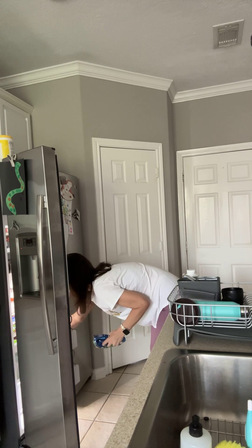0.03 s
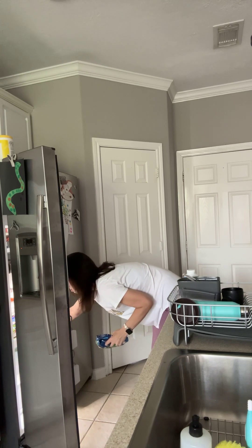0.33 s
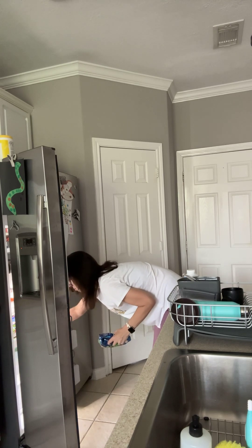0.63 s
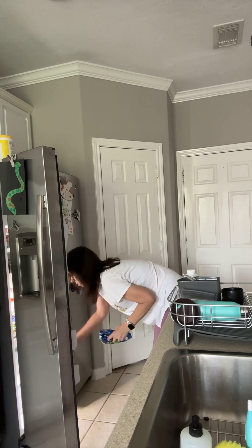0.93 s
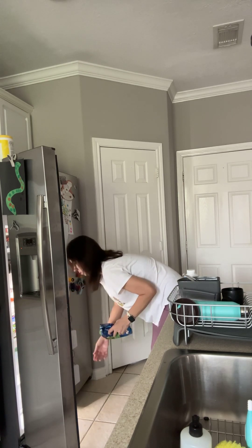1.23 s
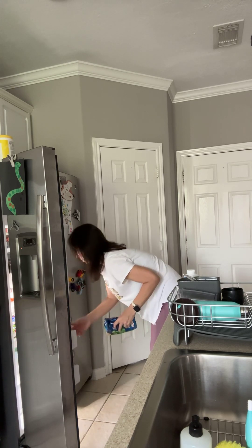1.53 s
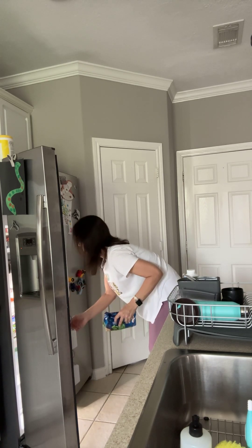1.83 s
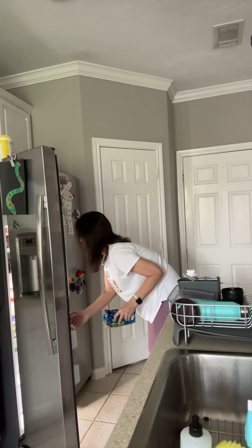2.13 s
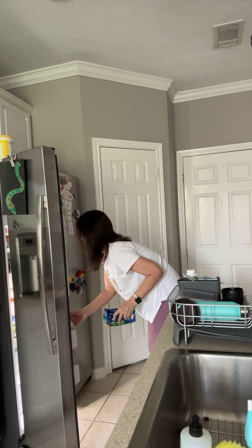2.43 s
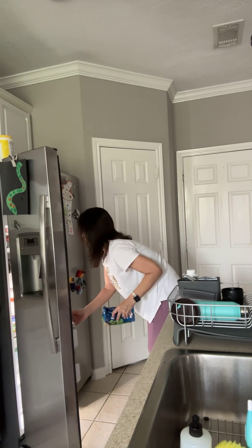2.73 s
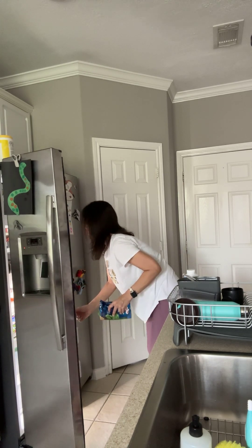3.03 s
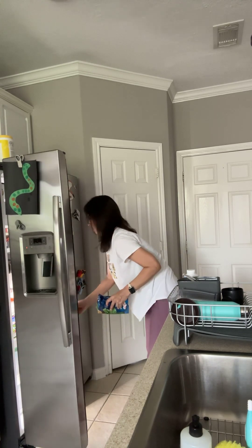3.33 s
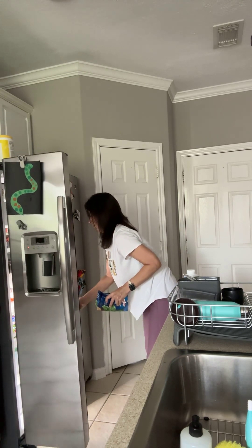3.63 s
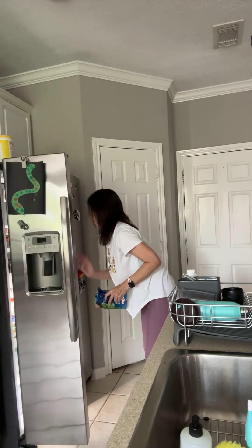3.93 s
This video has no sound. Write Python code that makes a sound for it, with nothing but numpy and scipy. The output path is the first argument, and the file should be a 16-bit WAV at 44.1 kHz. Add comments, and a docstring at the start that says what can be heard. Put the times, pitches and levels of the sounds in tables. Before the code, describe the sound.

A refrigerator is closed up, heard nearby in a quiet kitchen. A drawer rolls in, containers clacking, and thuds at 0.3 seconds. A food bag crinkles around 1.7 seconds. Light clicks and taps follow from 2.3 to 3, then a soft hand bump and faint creaks. At 3.4 the door shuts with a loud, slightly distorted bang and low thump, rebounding as jars rattle until about 3.8.

```python
"""A refrigerator in a tiled kitchen, heard from close by through a narrow-band microphone, in still air.
A drawer rolls in, its containers clack, a food bag crinkles, and the drawer thuds against its stop.
After a pause the bag rustles and snaps, things on the shelves click and tap, and a hand bumps the door.
The door creaks faintly, then shuts with a low thump and a bang that overloads the microphone.
Jars rattle in its shelves, the door rebounds, and the containers settle."""
import sys
import numpy as np
from scipy import signal
from scipy.io import wavfile
from scipy.ndimage import uniform_filter1d

SR = 44100
rng = np.random.default_rng(int(sys.argv[2]) if len(sys.argv) > 2 else 0)


def to_wav(sig):
    """Store sig (one row per channel, or 1-D mono) as 16-bit WAV at the path in sys.argv[1].

    Samples outside -1..1 are clipped; the rate is SR.
    """
    pcm = np.clip(np.atleast_2d(sig), -1, 1) * 32767
    pcm = np.round(pcm).astype(np.int16)
    wavfile.write(sys.argv[1], SR, pcm.T)  # frames by channels


N = 176400
TIME = np.arange(N) / SR
RING_TIME = TIME[:SR]
EDGES_HZ = np.geomspace(22, 11000, 28)
CENTRES_HZ = np.sqrt(EDGES_HZ[1:] * EDGES_HZ[:-1])
BANK = [signal.butter(2, pair, "band", fs=SR, output="sos") for pair in zip(EDGES_HZ, EDGES_HZ[1:])]


def from_db(db):
    """Decibels to gain."""
    return 10 ** (np.asarray(db) / 20)


def unit(x):
    """Scale to energy 1."""
    return x / np.sqrt(np.sum(x ** 2) + 1e-30)


def per_band(points):
    """Read (freq_hz, value) points at the band centres, on a log-frequency axis."""
    hz, value = np.transpose(points)
    return np.interp(np.log(CENTRES_HZ), np.log(hz), value)


def level(curve):
    """Gain over time from (time_s, level_db) points, silent outside them."""
    time_s, db = np.transpose(curve)
    return from_db(np.interp(TIME, time_s, db)) * (TIME >= time_s[0]) * (TIME <= time_s[-1])


def dying(t60_s):
    """Envelope that falls 60 dB in t60_s."""
    return np.exp(-np.log(1000) * RING_TIME / t60_s)


def strokes(rows, attack_s, release_s):
    """Attack, hold and release for each (start_s, length_s, level_db)."""
    return sum(from_db(db) * np.clip((TIME - start_s) / attack_s, 0, 1)
               * np.exp(-np.maximum(TIME - start_s - length_s, 0) / release_s)
               for start_s, length_s, db in rows)


def coloured(sources, colour):
    """Third-octave bands, fed in turn from the sources and set to a relative density per Hz; energy 1."""
    gains = from_db(per_band(colour)) * np.sqrt(CENTRES_HZ)
    bands = [unit(signal.sosfilt(sos, sources[k % len(sources)] + 1e-18)) for k, sos in enumerate(BANK)]
    return unit(sum(gain * band for gain, band in zip(gains, bands)))


def hiss(colour):
    """Steady coloured noise, rms 1."""
    return coloured(rng.standard_normal((2, N)), colour) * np.sqrt(N)


def clear_ring(modes, contact_s=0.00086):
    """Decaying sines that take contact_s to get going; energy 1."""
    rise = 1 - np.exp(-(RING_TIME / contact_s) ** 2)
    sines = sum((-1) ** k * from_db(db) * np.sin(2 * np.pi * hz * RING_TIME) * dying(t60_s)
                for k, (hz, db, t60_s) in enumerate(modes))
    return unit(rise * sines)


def struck(contacts, colour, modes, dense_t60_s, modes_db, dulling=0):
    """Every contact rings dense short modes and a few clear ones; its level is its energy over 10 ms.
    Weaker contacts are softer: they lose `dulling` dB per octave for each dB below the strongest."""
    out = np.zeros(N + SR)
    clear = clear_ring(modes)
    dense_decay = dying(dense_t60_s)[:SR // 4]
    strongest_db = max(db for _, db in contacts)
    for start_s, db in contacts:
        softened = [(hz, band_db - dulling * (strongest_db - db) * np.log2(hz)) for hz, band_db in colour]
        dense = coloured(rng.standard_normal((2, len(dense_decay))) * dense_decay, softened)
        ring = from_db(modes_db) * clear
        ring[:len(dense)] += dense
        start = int(start_s * SR)
        out[start:start + SR] += from_db(db) * unit(ring) * np.sqrt(SR / 100)
    return out[:N]


def grains(envelope, colour, per_s, spread_db, snap_t60_s=.005):
    """Random tiny snaps of uneven size under an envelope, each a fast-dying burst of noise."""
    sizes = from_db(spread_db * np.minimum(rng.exponential(1, N), 3))
    snaps = sizes * (rng.random(N) < per_s / SR)
    power = signal.lfilter([1], [1, -from_db(-120 / (snap_t60_s * SR))], snaps ** 2 + 1e-18)
    crackle = unit(np.sqrt(power) * rng.standard_normal((2, N))) * envelope
    return coloured(crackle, colour) * np.sqrt(np.sum(envelope ** 2))


def ringing(snaps, modes, ring_db):
    """A run of small contacts together with the modes that it keeps ringing."""
    ring = unit(signal.fftconvolve(snaps, clear_ring(modes))[:N])
    return snaps + from_db(ring_db) * ring * np.sqrt(np.sum(snaps ** 2))


# room tone spectrum: freq_hz, density_db
AIR_COLOUR = [(24, -58.5), (40, -45), (322, -4.5), (432, -4), (495, -8), (976, -4.5), (1040, -8),
              (2020, -7.5), (5000, -18.5), (8990, -34.5)]

def still_air():
    """The kitchen's still air, a faint steady hiss all around the microphone."""
    return from_db(-67.5) * hiss(AIR_COLOUR)


# the drawer's travel: time_s, level_db
ROLL_LEVEL = [(0, -35.5), (.05, -35.5), (.09, -34.5), (.15, -40), (.235, -42), (.255, -35.5), (.36, -40),
              (.44, -52.5)]
# rumble spectrum: freq_hz, density_db
ROLL_COLOUR = [(24, -36), (40, -28.5), (240, 5.5), (381, 7), (1040, -19), (1360, -35.5), (2470, -39.5),
               (4000, -37.5), (5200, -79), (8800, -120)]

def drawer_roll():
    """The drawer rumbles in close to the microphone and shudders to rest."""
    return level(ROLL_LEVEL) * hiss(ROLL_COLOUR)


# container contacts: start_s, level_db
CLACKS = [(.052, -37.5), (.0595, -24.5), (.064, -26), (.074, -46), (.47, -58.5)]
# their dense modes: freq_hz, density_db
CLACK_COLOUR = [(88, -43), (150, -7.5), (398, -2.5), (750, -7.5), (1540, -6), (1770, -14.5), (2100, 2.5),
                (3450, -23.5), (5660, -14), (8990, -27.5)]
# their clear modes: pitch_hz, level_db, t60_s
CONTAINER_MODES = [(1943, -5, 0.041), (2423, 1.5, 0.022), (3250, -9, 0.094), (5857, -1, 0.042)]

def container_clacks():
    """Plastic containers knock together inside the drawer."""
    return struck(CLACKS, CLACK_COLOUR, CONTAINER_MODES, dense_t60_s=0.07, modes_db=-8)


# folds of the bag: start_s, length_s, level_db, lowest_hz
CRINKLES = [(0.173, 0.038, -67.5, 5050), (0.176, 0.0056, -47.5, 5000), (1.649, 0.016, -53, 1410),
            (1.666, 0.023, -39, 298), (1.694, 0.022, -44, 1810), (1.722, 0.015, -52.5, 2000),
            (1.749, .011, -39, 1420), (1.775, 0.0058, -46, 3000), (2.991, 0.0084, -58, 3940)]
# crackle spectrum: freq_hz, density_db
BAG_COLOUR = [(200, -31.5), (812, -9.5), (1980, -6), (3000, -8), (5850, -4), (8990, -32.5)]
# modes of a typical fold: pitch_hz, level_db
BAG_MODES = [(1040, -2.5), (1320, -7), (1970, 3.5), (2390, -11.5), (4110, -5), (4670, -1), (5720, -5.5),
             (7300, -2.5)]

def food_bag(detune=.025, fold_spread_db=2.5, t60_s=.035):
    """Each crinkle is a burst of snaps in its own fold: small folds lack bass, and no two ring alike."""
    crackle = grains(np.ones(N), BAG_COLOUR, per_s=3000, spread_db=3)
    out = np.zeros(N)
    for start_s, length_s, db, lowest_hz in CRINKLES:
        envelope = strokes([(start_s, length_s, db)], attack_s=0.0018, release_s=0.0055)
        bass_cut = signal.butter(2, lowest_hz, "high", fs=SR, output="sos")
        snaps = signal.sosfilt(bass_cut, crackle * envelope + 1e-18)
        modes = [(hz * (1 + rng.normal(0, detune)), mode_db + rng.normal(0, fold_spread_db), t60_s)
                 for hz, mode_db in BAG_MODES]
        out += unit(ringing(snaps, modes, ring_db=-3.5)) * np.sqrt(np.sum(envelope ** 2))
    return out


# contacts with the stop: start_s, level_db
THUDS = [(.2572, -11), (.2602, -16.5), (.279, -24), (.294, -32.5)]
# the drawer's dense modes: freq_hz, density_db
THUD_COLOUR = [(30, -46), (207, -25.5), (367, 4), (538, -7.5), (827, -15), (1500, -21), (2000, -19.5),
               (3900, -25), (4500, -23.5), (8990, -65)]
# its clear modes: pitch_hz, level_db, t60_s
DRAWER_MODES = [(181.7, -21.5, 0.25), (336, -1, 0.055), (369, 0, 0.035), (538, -13.5, .15),
                (620.6, -14, 0.12), (639.6, -21.5, 0.23), (807, -13.5, 0.14)]

def drawer_thud():
    """The drawer meets its stop, each contact weaker and duller than the last."""
    return struck(THUDS, THUD_COLOUR, DRAWER_MODES, dense_t60_s=0.045, modes_db=3.5, dulling=0.08)


# spells of jostling: start_s, length_s, level_db
JOSTLES = [(.317, 0.017, -40), (.342, 0.02, -47.5), (3.792, .022, -47)]
# their spectrum: freq_hz, density_db
JOSTLE_COLOUR = [(590, -1), (1000, 9), (1800, 0.5), (2820, -4.5), (4000, -18), (6000, -16), (8990, -51.5)]

def container_jostle():
    """Containers jostle after the drawer stops, and settle after the bang."""
    envelope = strokes(JOSTLES, attack_s=0.0026, release_s=0.0054)
    contacts = grains(envelope, JOSTLE_COLOUR, per_s=450, spread_db=1)
    return ringing(contacts, CONTAINER_MODES, ring_db=-2)


# the bag's snap, then small contacts: start_s, level_db
CLICKS = [(1.757, -46.5), (2.343, -60.5), (2.574, -37), (2.982, -49.5), (3.028, -61.5)]
# the plastic's dense modes: freq_hz, density_db
CLICK_COLOUR = [(290, -63.5), (500, -14), (1540, 3), (1890, -33), (2240, 3), (3140, 11), (4200, -18),
                (4680, 0), (8990, -70)]
# its clear modes: pitch_hz, level_db, t60_s
CLICK_MODES = [(1912, 1.5, 0.033), (2975, -4, 0.05), (4680, -8.5, 0.035)]

def plastic_clicks():
    """A sharp snap in the bag's rustle, then hard plastic clicks, close and nearly dry."""
    return struck(CLICKS, CLICK_COLOUR, CLICK_MODES, dense_t60_s=0.065, modes_db=3)


# an item's contacts with the shelf: start_s, level_db
TAPS = [(2.477, -53), (2.4815, -37), (2.486, -48)]
# dense modes: freq_hz, density_db
TAP_COLOUR = [(100, -55), (183, 0), (587, 3.5), (1270, -6), (1650, -29), (3250, -41), (3510, -14),
              (5020, -3), (7590, -18), (8990, -63)]
# clear modes: pitch_hz, level_db, t60_s
TAP_MODES = [(599, 0, 0.032), (4030, -20, 0.057), (4970, 3.5, 0.022), (7100, 1.5, 0.011)]

def shelf_tap():
    """An item is set down near the microphone, touching three times in quick succession."""
    return struck(TAPS, TAP_COLOUR, TAP_MODES, dense_t60_s=0.1, modes_db=3)


# the hand's bump and the door's rebound: start_s, level_db
BUMPS = [(3.083, -29.5), (3.142, -52.5)]
# the open door's dense modes: freq_hz, density_db
BUMP_COLOUR = [(50, -60), (195, 6.5), (977, 5), (1660, -7.5), (2890, -12.5), (4700, -41), (5700, -25),
               (8000, -47)]
# its clear modes: pitch_hz, level_db, t60_s
BUMP_MODES = [(217, -8, 0.134), (397, 15.5, 0.039), (592, 3, 0.1), (981, 6, 0.095), (1090, 16.5, 0.025),
              (2850, -5, 0.046)]

def hand_bumps():
    """A hand bumps the door softly, and the door knocks back once, fainter and duller."""
    return struck(BUMPS, BUMP_COLOUR, BUMP_MODES, dense_t60_s=0.15, modes_db=4.5, dulling=0.18)


# spells of creaking: start_s, length_s, level_db
CREAKS = [(3.195, 0.036, -57), (3.212, 0.01, -55.5), (3.236, 0.018, -57.5), (3.315, 0.015, -58),
          (3.40, 0.03, -57.5)]
# their spectrum: freq_hz, density_db
CREAK_COLOUR = [(300, -17), (753, -5), (1480, -11), (1940, 0), (2740, -10.5), (8000, -35)]
# the modes they ring: pitch_hz, level_db, t60_s
CREAK_MODES = [(810, -3.5, .04), (1950, 2, .035)]

def door_creaks():
    """The swinging door creaks faintly, in dense runs of tiny snaps."""
    envelope = strokes(CREAKS, attack_s=0.0079, release_s=0.0054)
    snaps = grains(envelope, CREAK_COLOUR, per_s=3000, spread_db=-2.5)
    return ringing(snaps, CREAK_MODES, ring_db=-7)


# the shutting door's contacts: start_s, level_db
BANGS = [ (3.4272, -23), (3.4345, -1.5), (3.4385, 4), (3.445, -3), (3.5855, -14.5), (3.594, -17.5)]
# its dense modes: freq_hz, density_db
BANG_COLOUR = [(30, -51.5), (132, -26), (455, -4.5), (700, -11), (1080, -5), (1650, -7.5), (2540, -8),
               (2930, -10.5), (3220, -15.5), (3550, -11), (8990, -26.5)]
# its clear modes: pitch_hz, level_db, t60_s
DOOR_MODES = [(324, -6, 0.14), (840, -12, 0.18), (933.6, -2.5, 0.23), (1004, 6.5, 0.12), (1125, 17, 0.054),
              (1290, -4.5, 0.081), (1323, -11.5, 0.363), (1470, -4.5, 0.18), (1973, 8.5, 0.068),
              (2306, -13.5, 0.24), (2543, 14, 0.055), (4120, -1.5, 0.069)]

def door_bang():
    """The door shuts by the microphone: first touch, a blow of three contacts, and a double rebound."""
    return struck(BANGS, BANG_COLOUR, DOOR_MODES, dense_t60_s=0.053, modes_db=-1.5)


def low_thump(peak_s=3.44, width_s=0.0025, level_db=-17):
    """One short, deep thump sounding under the bang."""
    return from_db(level_db) * np.exp(-((TIME - peak_s) / width_s) ** 2 / 2)


# the shaking of the jars: time_s, level_db
RATTLE_LEVEL = [(3.44, -37), (3.47, -18), (3.57, -19.5), (3.62, -29.5), (3.7, -38.5), (3.73, -40),
                (3.76, -43.5), (3.785, -55), (3.803, -56), (3.84, -73)]
# rattle spectrum: freq_hz, density_db
RATTLE_COLOUR = [(88, -52), (150, -19.5), (288, -11.5), (398, 6), (725, -10), (1000, 1), (1390, 2),
                 (1710, 1), (2170, -0.5), (5570, -4.5), (8990, -47)]

def jar_rattle():
    """Jars shake in the door shelves and keep the door's modes ringing."""
    contacts = grains(level(RATTLE_LEVEL), RATTLE_COLOUR, per_s=800, spread_db=1.8)
    return ringing(contacts, DOOR_MODES, ring_db=-13)


# the kitchen's decay: freq_hz, t60_s
ROOM_T60 = [(60, 0.4), (250, 0.46), (1000, 0.28), (4000, 0.42), (9000, 0.37)]
# spectrum of its reverberation: freq_hz, density_db
ROOM_COLOUR = [(60, -12), (250, 2), (3000, 0), (9000, 1.5)]

def gated_reverb(delay_s=0.0031, build_s=0.0093, gate_s=.118):
    """The room's reverberation, with its tail gated short after about 0.12 s."""
    build = np.clip((RING_TIME - delay_s) / build_s, 0, 1)
    shape = build / (1 + (RING_TIME / gate_s) ** 8)
    tails = [rng.standard_normal(SR) * shape * dying(t60_s) for t60_s in per_band(ROOM_T60)]
    return coloured(tails, ROOM_COLOUR) * np.sqrt(EDGES_HZ[-1] / (SR / 2))


def scene():
    """One microphone beside the refrigerator: direct sound, reverberation, the low thump and still air."""
    layers = [  # sound, reverb_db
        (drawer_roll(), -20), (container_clacks(), -11), (food_bag(), -22), (drawer_thud(), -12),
        (container_jostle(), -17), (plastic_clicks(), -22), (shelf_tap(), -25), (hand_bumps(), -17),
        (door_creaks(), -12), (door_bang(), -8), (jar_rattle(), -8)]
    direct = sum(sound for sound, _ in layers)
    into_room = sum(sound * from_db(reverb_db) for sound, reverb_db in layers)
    reverb = signal.fftconvolve(into_room, gated_reverb())[:N]
    return (direct + reverb + low_thump() + still_air())[None]


def limiter(x, threshold_db=-7, attack_s=0.014, release_db_per_s=68):
    """Gain falls with a lag when the level passes a threshold, and recovers slowly."""
    level_db = 10 * np.log10(np.maximum(uniform_filter1d(x ** 2, size=220), 1e-12))
    over_db = np.maximum(level_db - threshold_db, 0)
    recovery_db = release_db_per_s * TIME
    held_db = np.maximum.accumulate(over_db + recovery_db, axis=-1) - recovery_db
    lag = np.exp(-1 / (attack_s * SR))
    return x * from_db(-signal.lfilter([1 - lag], [1, -lag], held_db))


def record(dry, mic_top_hz=9250, clip_level=.85, overload_top_hz=6000, cutoff_hz=16000):
    """A narrow-band microphone, a slow limiter, a dull overload on the bang, and a final top cut."""
    microphone = signal.ellip(10, .3, 70, mic_top_hz, fs=SR, output="sos")
    dull = signal.butter(1, overload_top_hz, fs=SR, output="sos")
    top_cut = signal.ellip(8, .1, 70, cutoff_hz, fs=SR, output="sos")
    heard = limiter(signal.sosfilt(microphone, dry))
    overload = signal.sosfiltfilt(dull, np.clip(heard, -clip_level, clip_level) - heard)
    return signal.sosfilt(top_cut, heard + overload)


dry = scene()
out = record(dry)
to_wav(out)
```